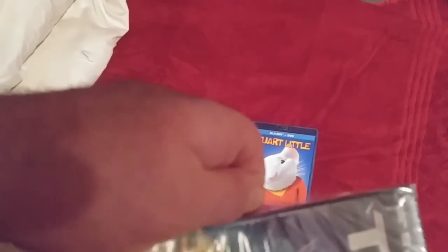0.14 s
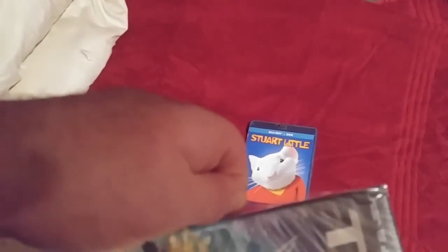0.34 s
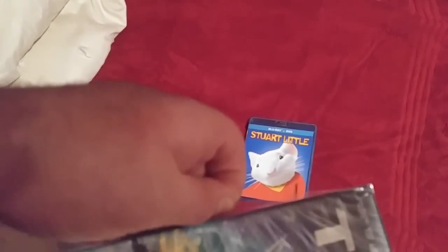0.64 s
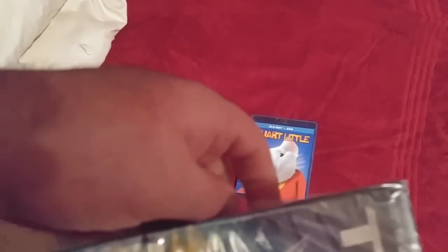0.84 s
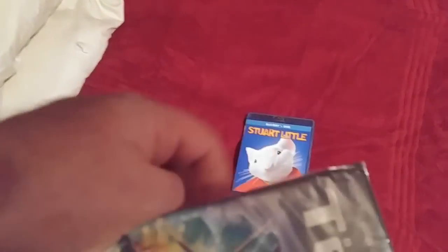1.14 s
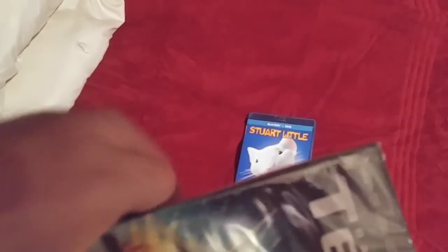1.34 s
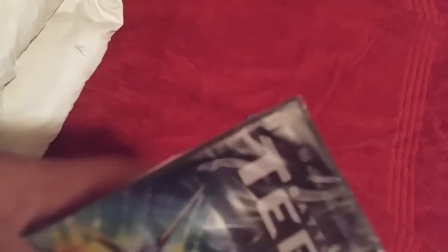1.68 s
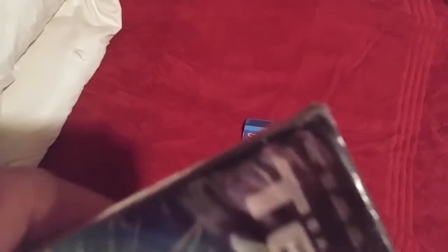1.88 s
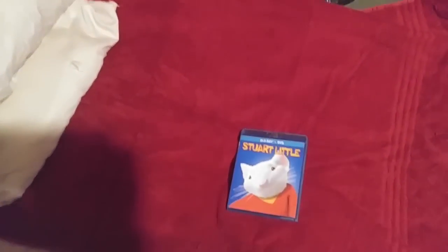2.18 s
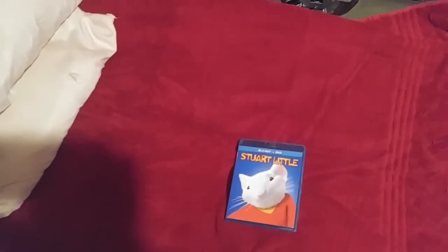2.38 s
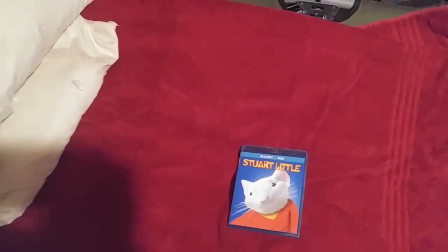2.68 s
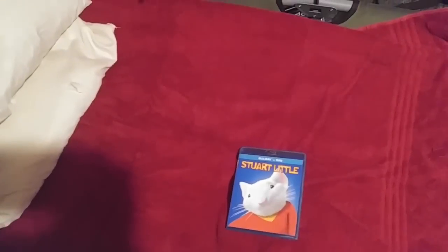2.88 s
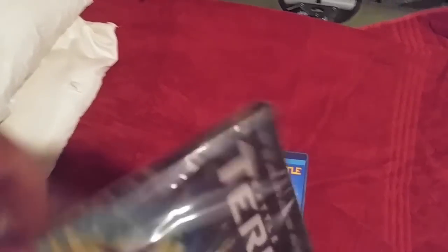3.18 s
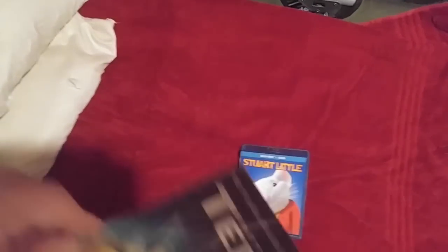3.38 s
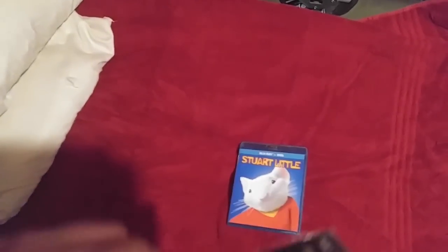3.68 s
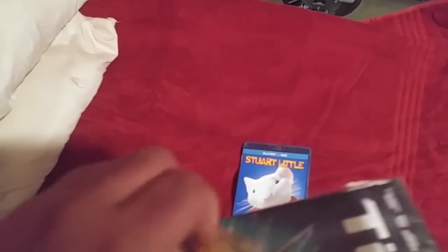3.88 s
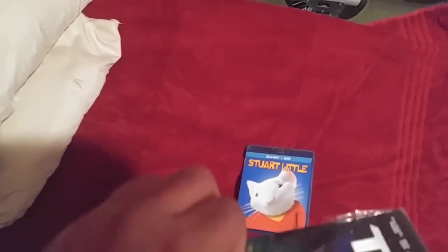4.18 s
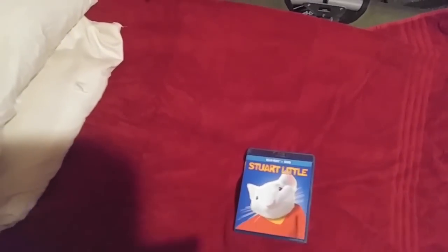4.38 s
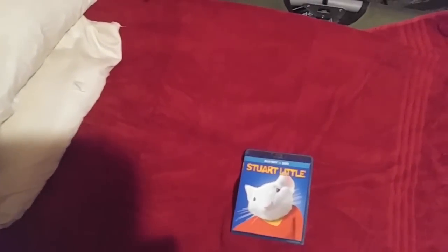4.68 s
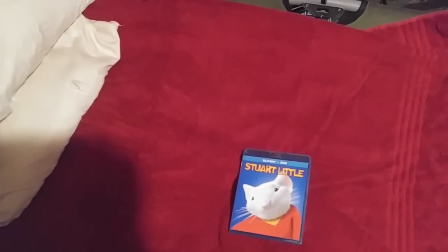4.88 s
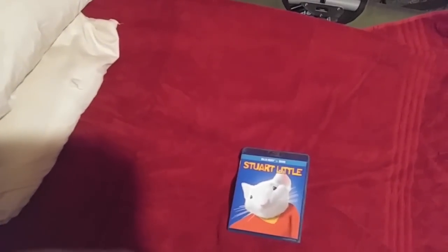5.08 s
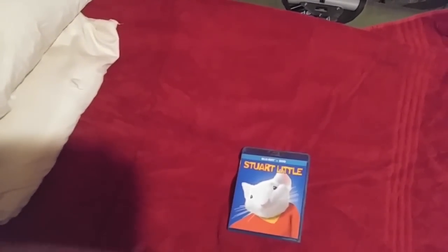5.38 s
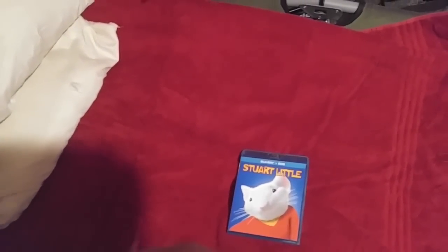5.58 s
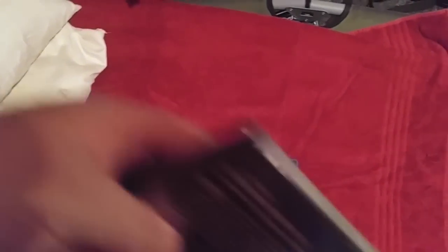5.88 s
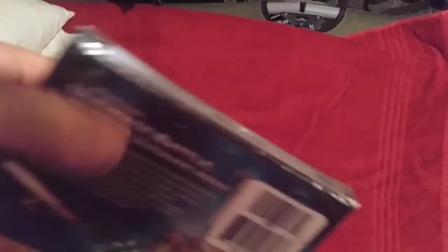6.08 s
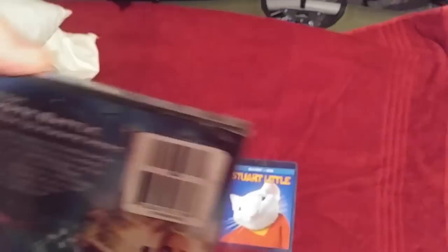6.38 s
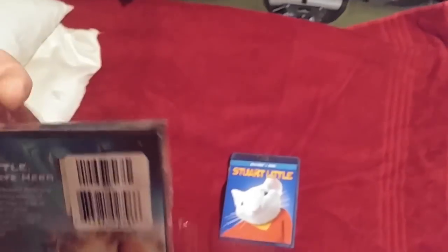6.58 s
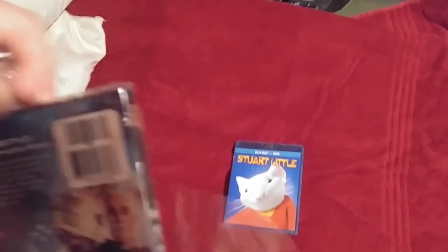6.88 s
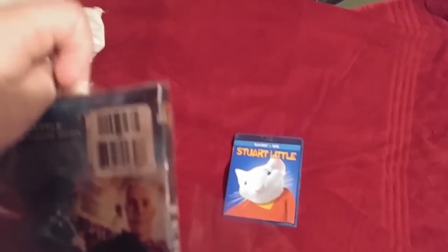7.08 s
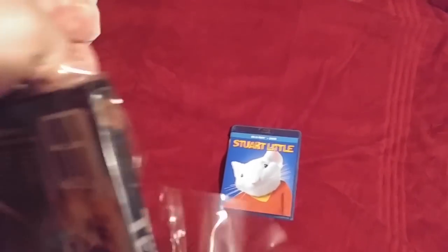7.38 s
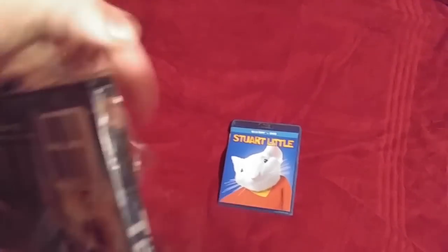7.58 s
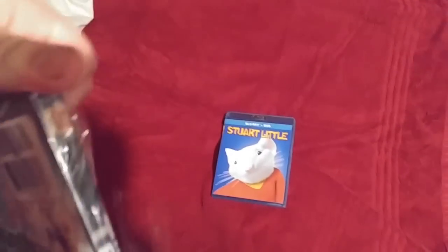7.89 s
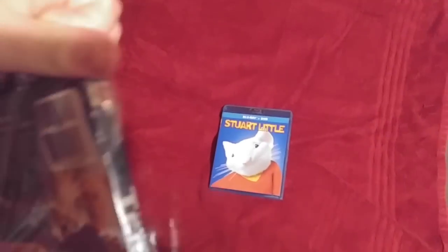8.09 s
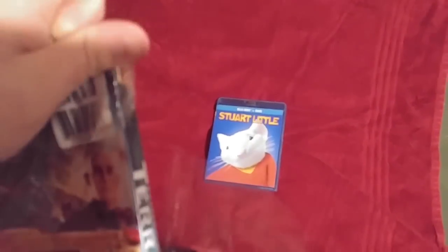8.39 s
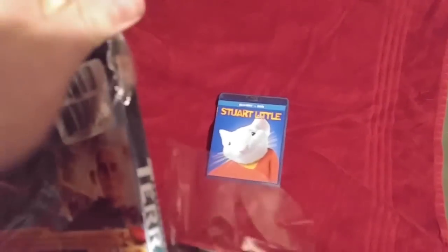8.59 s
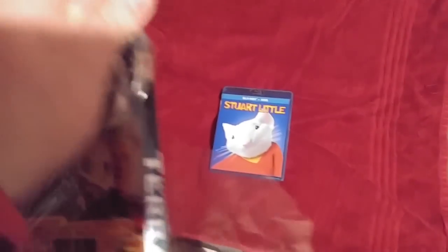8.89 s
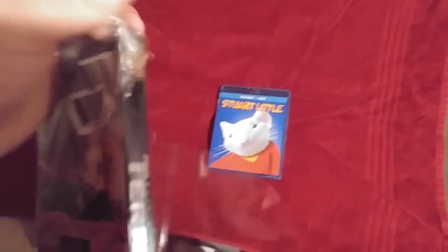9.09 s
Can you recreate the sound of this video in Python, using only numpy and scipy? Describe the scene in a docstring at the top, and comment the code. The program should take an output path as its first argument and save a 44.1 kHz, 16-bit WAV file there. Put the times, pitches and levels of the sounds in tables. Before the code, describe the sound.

Close to a stereo microphone in a small soft bedroom, hands pull thin film off a plastic disc case. A sharp snap and hollow knock come early, then a sparse, quiet spell. Rustling tugs return and grow denser and louder, with crisp crackles, short case knocks, dry finger rubs and occasional low thumps. Faint low mains hum sits underneath.

```python
"""In a bedroom, hands strip thin plastic film from a disc case, close to a small stereo camera.
Creases in the film snap as short noise bursts, over a crinkle of random grains that ring taut patches.
The hollow case knocks as short decaying tones, fingers rub it in small jerks, and jolts give low thumps.
A soft room answers with brief scrambled echoes, and a mains hum of sine tones sits in the room noise."""
import sys
import numpy as np
from scipy import signal
from scipy.io import wavfile
from scipy.ndimage import uniform_filter1d

SR = 44100
rng = np.random.default_rng(int(sys.argv[2]) if len(sys.argv) > 2 else 0)


def wav_record(signal):
    """Record a signal, one row per channel, as 16-bit PCM in the file named by sys.argv[1]."""
    frames = np.transpose(np.atleast_2d(signal))
    bounded = np.clip(frames, -1, 1)
    # unit amplitude maps onto the largest positive 16-bit level
    quanta = np.round(bounded * 32767).astype(np.int16)
    wavfile.write(sys.argv[1], SR, quanta)


N = 407925  # length in samples


def gain_of(db):
    """Turns decibels into a factor."""
    return 10 ** (np.asarray(db) / 20)


def evened(x):
    """Scales a sound to an average strength (rms) of 1."""
    return x / np.sqrt(np.mean(x ** 2) + 1e-20)


def read(points, hz):
    """Reads a table between its points, with pitch on a log scale as the ear hears it."""
    point_hz, value = np.transpose(points)
    return np.interp(np.log(hz + 1), np.log(point_hz + 1), value)


def sides(pan_db):
    """Left and right gains for a level difference; positive values favour the left."""
    return gain_of(np.array([pan_db / 2, -pan_db / 2]))


def add(mix, start_s, sound):
    """Mixes a stereo sound in at its start time, cut off where the scene ends."""
    part = mix[:, round(start_s * SR):][:, :sound.shape[1]]
    part += sound[:, :part.shape[1]]


def colour(x, points):
    """Filters with the given spectrum without looking ahead, so clicks keep sharp fronts."""
    log_gain = np.log(gain_of(read(points, abs(np.fft.fftfreq(8192, 1 / SR)))))
    # the Hilbert transform finds the phase that puts the energy as early as possible
    taps = np.fft.ifft(np.exp(np.conj(signal.hilbert(log_gain)))).real[:2048]
    return signal.oaconvolve(x, taps[None], axes=1)[:, :N]


def pair(same, size, lag=0):
    """Noise at two microphone ports, alike by the share same; the right hears that share lag samples late."""
    a, b = rng.standard_normal((2, size))
    same = np.clip(same, 0, 1)
    return np.array([a, same * np.roll(a, lag) + np.sqrt(1 - same ** 2) * b])


def control(table, column):
    """Draws straight lines through one column of a timed table, giving a value at every sample."""
    rows = np.array(table)
    return np.interp(np.arange(N) / SR, rows[:, 0], rows[:, column])


def grainy(per_s, spread_db, t60, hiss_db):
    """Strength of random jerks of uneven size, each dying by 60 dB in t60 seconds, over a steady hiss."""
    size = gain_of(spread_db * np.minimum(rng.exponential(1, N), 4))
    jerks = size * (rng.random(N) < per_s / SR)
    fade = np.exp(-np.log(1000) / (t60 * SR))
    return evened(signal.lfilter([1], [1, -fade], jerks)) + gain_of(hiss_db)


def ring(x, hz, sharp):
    """A resonance: lets one pitch through at full strength and weakens the rest."""
    return signal.lfilter(*signal.iirpeak(hz, sharp, fs=SR), x)


# Colour of the room noise before its overall level is set: pitch_hz [Hz], level_db [dB per Hz]
AIR_COLOUR = [(15, -42), (28, -58), (53, 4.5), (90, -5), (146, -9), (266, -6.5), (320, -15.5), (500, -29.5),
              (790, -35), (2200, -43.5), (3200, -47), (9000, -42), (16000, -45)]
# How alike the room noise is at the two ports: pitch_hz [Hz], likeness [0 to 1]
AIR_LIKENESS = [(60, 1), (180, 0.93), (550, 1), (1650, 0.19), (4970, 0.07), (15000, 0.03)]
# Tones of the mains hum: pitch_hz [Hz], level_db [dB]
HUM_TONES = [(120, -53), (240, -64)]
AIR_DB = -51


def room_noise():
    """Noise from random short-time spectra, alike in the bass at both ports, plus a slightly wavering hum."""
    frames, hz = N // 512 + 5, np.fft.rfftfreq(2048, 1 / SR)
    a, b, c, d = rng.standard_normal((frames, 1025, 4)).T
    same = np.clip(read(AIR_LIKENESS, hz), -1, 1)[:, None]
    left = a + 1j * b
    right = same * left + np.sqrt(1 - same ** 2) * (c + 1j * d)
    spectra = np.array([left, right]) * gain_of(read(AIR_COLOUR, hz))[:, None]
    air = gain_of(AIR_DB) * evened(signal.istft(spectra, nperseg=2048, noverlap=1536)[1][:, :N])

    # smoothing noise twice leaves a slow drift
    waver = evened(uniform_filter1d(uniform_filter1d(rng.standard_normal(N), 4000), 4000))
    t = np.arange(N) / SR
    hum = 0
    for pitch_hz, level_db in HUM_TONES:
        hum = hum + np.sqrt(2) * gain_of(level_db + 0.17 * waver) * np.sin(2 * np.pi * pitch_hz * t)
    return air * sides(1.9)[:, None] + hum * sides(0.57)[:, None]


# Slowly changing handling beneath the tugs, joined by straight lines:
# time_s [s], crinkle_db [dB], rubbing_db [dB], skin_db [dB], left_right_db [dB]
HANDLING = [(0,-63.5,-56,-59.5,3),(.65,-71,-66,-65.5,1.5),(1,-65,-57,-64,0.5),(1.7,-60.5,-52,-58,2),(1.9,-58,-48.5,-53.5,3),(2.15,-59,-48,-53.5,4.5),(2.28,-57.5,-57,-65.5,4.5),
            (2.8,-54.5,-56.5,-65,5),(3.3,-51,-45.5,-57,4.5),(3.75,-52,-58.5,-66,2),(3.95,-53,-50.5,-53.5,1),(4.6,-49,-50,-54,0),(5.3,-56.5,-54,-57.5,0.5),
            (5.65,-47,-50,-52.5,-1),(6.1,-55,-50.5,-55.5,3),(6.27,-55,-61,-64,4.5),(6.7,-50,-50.5,-60,3),(7.2,-52,-55.5,-57,3.5),(7.8,-45,-49,-49,5),
            (8.4,-53.5,-55,-58,3.5),(8.87,-62,-56,-64,3),(9.25,-47,-48,-52,4)]
# Each tug at the film, a burst of rustle: peak_s [s], crinkle_db [dB], rubbing_db [dB], skin_db [dB],
# build_s [s to rise 20 dB], die_s [s to fall 20 dB]; the two times count as at least 0.005 s
FILM_TUGS = [(0,-43,-43,-52,.05,0.11),(.142,-45.5,-48,-51,-0.2,0.11),(.459,-50,-57.5,-66,.04,.08),(.713,-52,-65,-70,.02,-0.1),(0.768,-26.5,-32,-46,0,0.06),
             (1.043,-52.5,-58,-61,0.3,-1.4),(1.147,-51.5,-67,-68,0.12,0.3),(1.242,-54.5,-72,-69,0,.15),(1.39,-43.5,-53,-54,0.11,0.32),(1.527,-48,-44,-54,0.06,0.07),
             (1.677,-50.5,-50,-58,0.03,0.16),(2.079,-42.5,-39,-53,0.03,0),(2.34,-63,-51.5,-58,0,0.3),(2.62,-37,-42,-41.5,0.11,0.19),(2.95,-50,-51,-57,0.6,-3.2),(3.048,-44,-50.5,-48.5,0.4,0.24),
             (3.263,-38.5,-40,-50,.05,0.1),(3.362,-61,-55,-56,-4,0),(3.448,-35.5,-43.5,-41.5,-0.33,0.08),(3.723,-43.5,-54,-53,0.07,0.05),(3.889,-42,-47,-53,.03,0.02),
             (4.006,-58,-63,-65,0.4,0.3),(4.319,-36.5,-45.5,-46.5,-0.07,0.18),(4.587,-40,-46.5,-50.5,0.06,0.26),(4.749,-47.5,-48.5,-54.5,0.22,0.01),(4.884,-43,-73,-53,.03,0.2),
             (5.063,-42.5,-48,-55,0.14,.2),(5.293,-43,-42,-52.5,0,-0.1),(5.41,-41.5,-50,-49,-0.13,0.03),(5.451,-37.5,-45,-49,0.1,-0.02),(5.525,-41,-61,-52,.025,0.28),(5.754,-47.5,-67,-59,0.3,0.2),
             (5.976,-45.5,-63,-58,.2,.15),(6.064,-44,-60,-61,0.06,0.04),(6.518,-33,-43.5,-44,0.2,0.22),(6.583,-49,-78,-44,0.02,-0.1),(6.912,-34.5,-44,-41.5,0.09,.3),
             (7.308,-37,-61,-47,0.05,0.12),(7.406,-35.5,-44.5,-45,0.1,0),(7.543,-29.5,-46,-36.5,0.03,-0.04),(7.76,-38.5,-46,-51,0.26,0.2),(7.855,-32,-50,-56,0.19,-0.1),
             (7.977,-32.5,-43.5,-51,.06,0.09),(8.134,-43,-53,-56,.09,0.23),(8.286,-39,-47.5,-47,0.1,0.12),(8.483,-41,-52,-54,0.03,0.2),(8.728,-41.5,-57,-55,0.06,0.16),(8.777,-51,-39,-47,-0.31,-0.1),
             (9.049,-41,-43.5,-45,0.14,0.24),(9.249,-36,-44,-48,0.19,-5)]


def effort(column):
    """Strength of one hand sound: slowly changing handling plus tugs that build and die exponentially."""
    t, power = np.arange(N) / SR, gain_of(control(HANDLING, column)) ** 2
    for tug in FILM_TUGS:
        peak_s = tug[0]
        build_s, die_s = np.maximum(tug[-2:], .005)
        drop_db = 20 * np.maximum((t - peak_s) / die_s, (peak_s - t) / build_s)
        power = power + gain_of(tug[column] - drop_db) ** 2
    return np.sqrt(power)


def hands_pan_db():
    """Left-right level difference of the hands at every sample."""
    return control(HANDLING, column=4)


# Colour of the film's crackle: pitch_hz [Hz], level_db [dB per Hz]
FILM_COLOUR = [(700, -6.5), (1300, -8.5), (2400, -3), (3200, -1.5), (5900, 2), (8500, 2.5), (12000, -3),
               (16000, -9.5)]
LOW_TOP_HZ, TREBLE_LOW_HZ, TREBLE_TOP_HZ = 3000, 3600, 12000  # band edges


def film_bands():
    """Three filters holding the film's colour, cut into lower mids, treble and top."""
    film = colour(signal.unit_impulse((1, 2048)), FILM_COLOUR)[:, :200]
    cuts = (("low", LOW_TOP_HZ), ("band", (TREBLE_LOW_HZ, TREBLE_TOP_HZ)), ("high", TREBLE_TOP_HZ))
    bands = []
    for kind, edge_hz in cuts:
        cut = signal.butter(N=3, Wn=edge_hz, btype=kind, fs=SR, output="sos")
        bands.append(signal.sosfilt(cut, film))
    return bands


def crinkle():
    """Countless tiny creases of uneven size: many fill all bands, others ring one taut patch of film."""
    film = pair(0.39, size=N, lag=3)
    creases = grainy(per_s=350, spread_db=2.0, t60=0.0016, hiss_db=-27.0) * film
    for patch_hz in np.geomspace(1800, 14500, num=8):
        grains = grainy(per_s=90, spread_db=3.0, t60=0.013, hiss_db=-26.0)
        creases = creases + 2.3 * ring(grains * film, patch_hz, sharp=1.47)
    coloured = 0
    for taps, band_db in zip(film_bands(), (-7.5, .1, -.5)):
        coloured = coloured + gain_of(band_db) * signal.oaconvolve(creases, taps, axes=1)[:, :N]
    return effort(column=1) * sides(hands_pan_db()) * evened(coloured)


# Colour of the case wall under rubbing fingers: pitch_hz [Hz], level_db [dB per Hz]
CASE_COLOUR = [(200, -24), (350, -8), (560, -6.5), (700, 2), (840, 5.5), (1090, -3), (1500, -18.5),
               (2500, -35.5)]
# Colour of skin dragging on film: pitch_hz [Hz], level_db [dB per Hz]
SKIN_COLOUR = [(700, -21), (1200, 2.5), (2300, 1.5), (2550, 0), (2800, -9), (3600, -11), (5000, -26)]


def rubbing():
    """Fingers slip in small uneven jerks that ring the case wall, and their skin drags on the film."""
    jerks = grainy(per_s=360, spread_db=-2.5, t60=0.023, hiss_db=-11.0)
    wall = effort(column=2) * evened(colour(jerks * pair(0.91, size=N, lag=3), CASE_COLOUR))
    drag = grainy(per_s=360, spread_db=2.5, t60=0.015, hiss_db=-6.5)
    skin = effort(column=3) * evened(colour(drag * pair(0.15, size=N, lag=6), SKIN_COLOUR))
    return (wall + skin) * sides(hands_pan_db())


SMALL_PER_S = 22
SMALL_DB, SMALL_SPREAD_DB = 8.5, 3  # a random snap above the crinkle, and its scatter
SMALL_LOW_DB, SMALL_LOW_SPREAD_DB = -18.5, 5.5  # lower mids relative to the treble
SMALL_TOP_DB, SMALL_TOP_SPREAD_DB = -2.5, 5  # top relative to the treble


def small_snaps():
    """More creases snap at random moments, following the crinkle's loudness, each with its own colour."""
    when = rng.random(round(SMALL_PER_S * N / SR)) * (N - 2 * 300) + 300  # samples, clear of both ends
    size, low, top = rng.standard_normal((len(when), 3)).T
    crinkle_db = 20 * np.log10(effort(column=1)[when.astype(int)])
    treble_db = crinkle_db + SMALL_DB + SMALL_SPREAD_DB * size
    low_db = SMALL_LOW_DB + SMALL_LOW_SPREAD_DB * low
    top_db = SMALL_TOP_DB + SMALL_TOP_SPREAD_DB * top
    return list(zip(when / SR, treble_db, low_db, top_db))


# Creases snapping at set moments, loud and faint: peak_s [s], treble_db [dB],
# low_db [lower mids, dB relative to the treble], top_db [top, dB relative to the treble]
SET_SNAPS = [(0.0112,-31,-18,-9),(0.0464,-29.5,-9,-1),(.1271,-29,-12,-16),(0.133,-20,-10.5,9),(0.14,-20,-25,-11),(.1424,-14.5,-11,-9),
             (.3004,-28.5,-53,6.5),(0.3456,-26.5,-23,-8),(.4123,-32.5,-14,-13),(0.4454,-21,-17,-14),(0.4613,-24,-36,-1),(.7139,-26,-24,9),
             (.7526,-8.5,-13,-5),(0.7576,-11,-19,-3),(0.7578,-11.5,-11,2),(0.772,-16,-13,1),(.8385,-26.5,-9.5,-7),(.9427,-43,-27,-6),(0.964,-45,-43,-6),(1.0316,-35,-2.5,-13),
             (1.0736,-38,-4,-3),(1.1058,-34,-27,-3),(1.14,-44,4,-7),(1.156,-36,-5,-16),(1.2068,-39,0,-7),(1.234,-30,-16,-23),(1.2622,-32.5,-16,-17),(1.286,-38,-22,-10),(1.308,-36,-20,-18),(1.379,-21.5,-27,-34),(1.5227,-24.5,-11,-17),(1.566,-41,-8,-13),(1.681,-38,6.5,-12),(1.849,-32,-13,-11),
             (1.9264,-37.5,-2.5,8.5),(2.2074,-40,-10,-32),(2.3537,-31.5,-3,-3),(2.3806,-41,6,-18),(2.437,-34,-7,4),(2.5,-26.5,-6,9),
             (2.5395,-32,-2,7),(2.587,-30.5,5,12),(2.593,-27.5,-15,5),(2.6195,-18.5,-1,2),(2.652,-38,6,-4),(2.676,-33.5,6,-9),(2.733,-34,-24,6),(2.7526,-28,-7,1),(2.9482,-29.5,0,9),
             (3.019,-32,-12,-4),(3.041,-22.5,-11,6),(3.054,-22.5,-5,-4),(3.09,-29,-3,-2),(3.1056,-23.5,-3,-11),(3.111,-22.5,-7,5),
             (3.1222,-21,-3,-7),(3.1518,-21.5,-7.5,3),(3.166,-22,-7,-10),(3.1897,-23.5,-7,-7),(3.21,-27,-5,-2),(3.2462,-20.5,-6.5,-2),
             (3.259,-19,-16,-10),(3.27,-23,-14,-6),(3.3262,-30,-30,-16),(3.357,-15,-20,-22),(3.4058,-32,-16,-8),(3.4224,-25,-14,4),(3.4559,-21.5,-7,-2),
             (3.5678,-33,-8,-5),(3.6307,-31,3.5,-6),(3.7068,-27,-18,-8),(3.7818,-29.5,-17,1),(3.7948,-25,-17,-4),(3.8302,-25,-15,-7),
             (3.8696,-22,-21,-10),(3.9008,-27,-12,-18),(4.0531,-33,-30,-1),(4.1011,-34.5,-22,2),(4.1335,-34,-19,-5),(4.14,-29.5,-28,-9),(4.2582,-32.5,-15,-15),(4.315,-26,-0.5,-13),(4.326,-18,-18,0),(4.3447,-26.5,-3.5,-7),
             (4.4648,-36.5,-39,9.5),(4.8315,-46.5,-31,-32),(4.873,-32,-56,3.5),(5.054,-30.5,-18,-6),(5.2794,-36,-7,-5),(5.406,-30,-11,-21),(5.5086,-27.5,-11,3),
             (5.5541,-19,-12,-9),(5.8144,-29,-15,2),(5.9693,-29.5,-9,-3),(5.9723,-25.5,-17,-17),(6.0364,-30,-21,-2),(6.1,-39,-2,-9),(6.163,-32,-25,-7),(6.1789,-38.5,0.5,-7),(6.2295,-48,12,-12),
             (6.412,-27.5,-23,4),(6.49,-28,-8,-17),(6.512,-14,-19,-6),(6.5246,-18.5,-4,-9),(6.579,-14.5,-10.5,-3),(6.637,-39,-6,-43),
             (6.6912,-27,-8,-14),(6.7153,-25,-7.5,-10),(6.747,-26,-25,-15),(6.792,-33.5,-1,-12),(6.8207,-32,-4,-4),(6.8783,-29,-4,2),(6.889,-29,-3,-4),(6.8963,-28,-17,-9),(6.904,-13,-12,-15),
             (6.9092,-7,-5,-15),(6.912,-12,-19,-9),(6.917,-19,-6,-6),(6.951,-37,11.5,-13),(6.9628,-17,-12,-7),(7.0075,-20,-29,-22),(7.1421,-21,-6.5,-25),
             (7.1455,-40,13,-5),(7.197,-32,-24,-2),(7.211,-37,9,-7),(7.297,-26,-6,2),(7.3096,-26.5,1.5,-3),(7.3204,-26,-10,-2),(7.358,-23.5,-0.5,-7),
             (7.376,-20,-11.5,-3),(7.3947,-21,-17,1),(7.417,-22,-14,-10),(7.4665,-30,-4,-20),(7.4817,-30.5,-1.5,-11),(7.592,-35.5,9,-21),(7.6407,-28.5,-5,-19),
             (7.7528,-33,-20,5),(7.7622,-23.5,-15,0),(7.8092,-21,-7,-9),(7.8437,-22,-3,-15),(7.8485,-14.5,-19,-20),(7.8658,-20,-10,-3),
             (7.9421,-22,-35.5,-14),(7.947,-21.5,-21,-7),(7.9633,-19.5,-13,-9),(7.9676,-17.5,-19,-4),(7.972,-24,-7,-11),(7.9786,-20,-14,-7),
             (8.007,-20,-14,-10),(8.0173,-20,-24,1),(8.0428,-18.5,-25,-8),(8.0737,-22,-27,-15.5),(8.1126,-26.5,-13,-6.5),(8.1244,-22,-17,-8),
             (8.1348,-20,-29,-8),(8.2538,-19.5,-14,-14.5),(8.272,-13,-14.5,-26),(8.307,-25,-25,-6),(8.337,-19,-17,-6),(8.469,-37,-17,2),(8.517,-25,-13,-3),
             (8.5641,-25,-8.5,1),(8.644,-44,0,-11),(8.671,-40,5,-12),(8.6856,-32.5,-16,0),(8.718,-28,-17,-9),(8.7357,-32,-31,4),(8.7433,-27.5,-28,-2),(8.7663,-43.5,10,-9),(8.8762,-40,-5,-5),(8.8946,-32.5,-19,-7),(8.91,-31,-3,-4),
             (9.0042,-34,-13,-4),(9.044,-30,0,-9),(9.05,-24,-7,-13),(9.061,-29,-5,-15),(9.118,-24.5,-19,-6),(9.143,-26,-26,-18),(9.1929,-26,0,-25.5),(9.2023,-27.5,2,-11),(9.2277,-28.5,-8,2)]
SNAP_SAME = .85  # left-right likeness of a snap


def snaps(rise_s=0.00046, fall_s=0.00044, ring_db=4.0):
    """A crease buckles in a very short burst; wide creases carry more lower mids, tight ones more top."""
    out, t = np.zeros((2, N)), np.arange(-80, 260) / SR
    pan_db, bands = hands_pan_db(), film_bands()
    for peak_s, treble_db, low_db, top_db in SET_SNAPS + small_snaps():
        length = np.exp(0.44 * rng.standard_normal())  # some die faster than others
        shape = np.exp(-np.where(t < 0, (t / rise_s) ** 2, t / fall_s / length))
        burst = pair(SNAP_SAME, size=len(t), lag=rng.integers(0, 7)) * shape  # each crease at its own angle
        patches_hz = np.exp(rng.uniform(np.log([1300, 4500, 12000]), np.log([2800, 11000, 15500])))
        levels_db = (treble_db + low_db, treble_db, treble_db + top_db)
        for taps, band_db, patch_hz in zip(bands, levels_db, patches_hz):
            part = signal.fftconvolve(burst, taps, axes=1)
            # the taut patch beside the crease rings briefly
            part = part + gain_of(ring_db) * ring(part, patch_hz, sharp=3.6)
            peak = np.sqrt(2 * uniform_filter1d((part ** 2).mean(0), size=50).max())
            pan = sides(pan_db[round(peak_s * SR)])[:, None]
            add(out, peak_s + t[0], gain_of(band_db) / peak * part * pan)
    return out


# The hollow case knocked or flexed, each knock with its own note:
# peak_s [s], level_db [dB], pitch_hz [Hz]
CASE_KNOCKS = [(.0122,-34.5,1000),(.1284,-32,920),(.1348,-29.5,890),(.2836,-35,1000),(.7152,-30,1070),(.7545,-13,800),(.7591,-8.5,1150),
               (.7844,-26,810),(1.0046,-32.5,1030),(1.033,-33,910),(1.0741,-27.5,805),(1.1144,-35,854),(1.14,-33,880),(1.1586,-30,804),(1.2083,-24,790),
               (1.4126,-29.5,920),(1.6716,-28,855),(1.6839,-26.5,910),(1.696,-27.5,760),(1.8591,-31.5,900),(2.1025,-29,830),(2.1286,-31.5,805),
               (2.5027,-31.5,770),(2.5942,-27.5,820),(2.6283,-33,1030),(2.7359,-27,870),(2.8014,-22.5,820),(2.8443,-32,845),(3.1058,-29,810),
               (3.1689,-27,740),(3.2497,-30,825),(3.3577,-29,1000),(3.4066,-30,760),(3.5318,-22,750),(4.3433,-33,875),(4.5569,-29.5,1240),
               (5.113,-33,780),(5.329,-31,930),(5.4548,-29.5,710),(5.628,-27,785),(6.016,-33,895),(6.2329,-27,740),(6.5121,-28,905),
               (6.9131,-13.5,870),(6.9511,-24,1190),(6.9636,-18,1380),(7.1419,-27.5,970),(7.211,-34.5,1000),(7.2985,-32,980),(7.5456,-31.5,900),
               (7.6416,-26,810),(7.7537,-27.5,990),(7.8518,-21.5,890),(7.965,-26,1100),(8.0027,-27,960),(8.2547,-31,870),(8.5234,-30.5,765),(8.645,-41,830),(8.7668,-33,970),(8.9102,-36.5,740),(9.04,-33,750),(9.1939,-19.5,806)]
KNOCK_LAG_S = 0.00013  # how late the right port feels the case


def knocks(rise_s=0.00089, cycles=8.5):
    """Each knock rings the hollow case for a few cycles, with a weaker upper note that dies sooner."""
    out, t, pan_db = np.zeros((2, N)), np.arange(-150, 1400) / SR, hands_pan_db()
    port_t = t - np.array([[0], [KNOCK_LAG_S]])
    for peak_s, level_db, pitch_hz in CASE_KNOCKS:
        turn = 2 * np.pi * (pitch_hz * port_t + rng.random())
        fall = gain_of(-60 * t * pitch_hz / cycles)  # 60 dB down after this many cycles
        shape = np.where(t < 0, np.exp(-(t / rise_s) ** 2), fall)
        tone = np.sin(turn) + gain_of(-9.5) * shape * np.sin(1.28 * turn)
        pan = sides(pan_db[round(peak_s * SR)])[:, None]
        add(out, peak_s + t[0], gain_of(level_db) * shape * tone * pan)
    return out


# How long the room's echoes take to fall by 60 dB: pitch_hz [Hz], t60_s [s]
ROOM_DECAY = [(300, 0.17), (900, 0.022), (3000, 0.12), (8000, 0.093), (14000, 0.16)]


def room(x):
    """Diffuse echoes: the energy of each band lingers and dies at its own speed, with scrambled phase."""
    frame = dict(fs=SR, nperseg=128, noverlap=96)
    hz, t, spectra = signal.stft(x, **frame)
    power = uniform_filter1d((abs(spectra) ** 2).mean(0), size=5, axis=0)
    keep = gain_of(-120 * (t[1] - t[0]) / read(ROOM_DECAY, hz))  # -120 because it acts on power
    # three frames of delay: the walls answer 2 ms late
    held = np.array([signal.lfilter([0, 0, 0, 1 - k], [1, -k], p) for k, p in zip(keep, power)])
    scramble = signal.stft(pair(1.0, size=N), **frame)[2]
    size = np.sqrt(abs(held)) * evened(abs(scramble))
    return signal.istft(size * np.exp(1j * np.angle(scramble)), **frame)[1][:, :N]


# The hand jolting the case or the camera: start_s [s], level_db [dB, before it dies away], pitch_hz [Hz]
JOLTS = [(0.7514, -13, 306), (0.751, -12, 129), (0.763, -20, 55), (1.564, -37, 120), (1.675, -37, 119),
         (1.691, -28, 261), (2.09, -22, 89), (2.094, -28, 163), (2.1, -30, 55), (2.218, -48, 150),
         (2.619, -25, 306), (2.8, -24, 257), (2.812, -36, 80), (2.846, -31, 328), (3.273, -27.5, 330),
         (3.354, -20.5, 342), (3.458, -26, 280), (3.531, -28, 196), (9.192, -36, 300)]
THUMP_CYCLES = 6.5  # cycles to fall 60 dB
THUMP_LAG_TURNS = 0.028  # how late the right port feels a jolt, in cycles


def thumps():
    """A low push that dies within a few cycles and shakes the left port more."""
    out, t = np.zeros((2, N)), np.arange(6000) / SR
    for start_s, level_db, pitch_hz in JOLTS:
        tone = np.sin(2 * np.pi * (pitch_hz * t - np.array([[0], [THUMP_LAG_TURNS]])))
        rise = np.minimum(t * pitch_hz, 1)  # builds over one cycle
        fall = gain_of(level_db - 60 * t * pitch_hz / THUMP_CYCLES)
        add(out, start_s, tone * rise * fall * sides(9.9)[:, None])
    return out


ROOM_DB = -11  # gain of the echoes


def scene():
    """Film and case close by, their echoes, the thumps and the room noise."""
    near = snaps() + crinkle() + knocks() + rubbing()
    echoes = gain_of(ROOM_DB) * room(near) * sides(1.1)[:, None]
    return near + echoes + thumps() + room_noise()


# Colour of the whole sound: a notch low down, a peak near 10 kHz, a steep fall above 15.7 kHz:
# pitch_hz [Hz], level_db [dB]
OVERALL_COLOUR = [(420, -0.42), (515, -8.5), (600, 2.5), (8300, -0.5), (9050, -3.5), (9600, 7),
                  (10200, 9.5), (11000, 5), (15650, 4), (15900, -11), (16600, -14)]
HEADROOM = .78  # the level that loud peaks bend towards, full scale = 1
EDGE_HZ = 16620  # upper band limit


def record(dry):
    """Overall colour, peaks gently rounded below full scale, then the band limit."""
    heard = HEADROOM * np.tanh(colour(dry, OVERALL_COLOUR) / HEADROOM)
    band_limit = signal.firwin(511, EDGE_HZ, window=("kaiser", 9), fs=SR)
    return signal.oaconvolve(heard, band_limit[None], "same")


dry = scene()
out = record(dry)
wav_record(out)
```